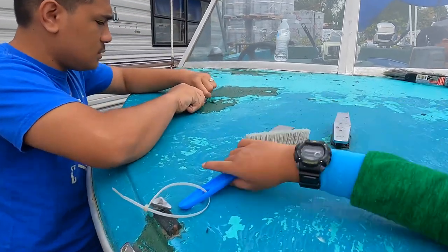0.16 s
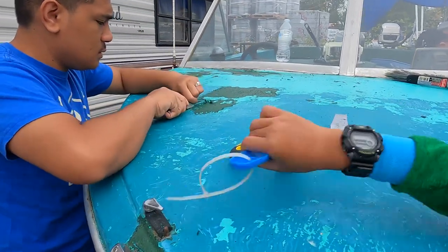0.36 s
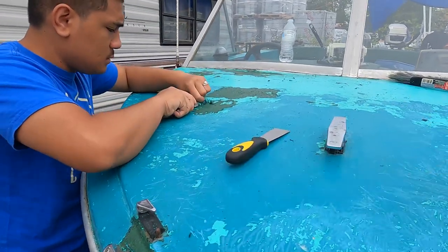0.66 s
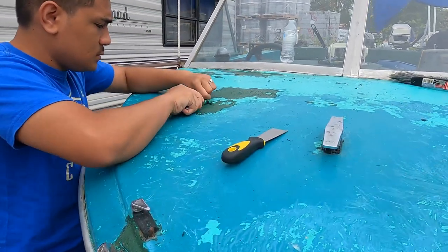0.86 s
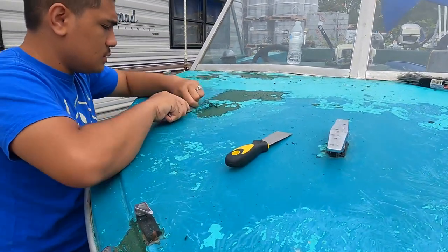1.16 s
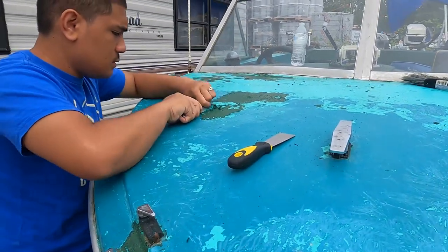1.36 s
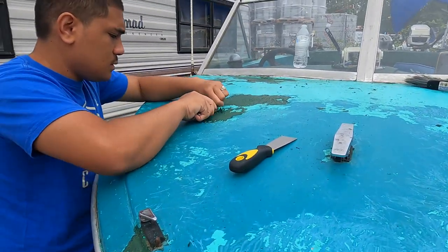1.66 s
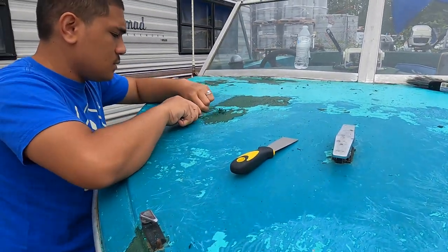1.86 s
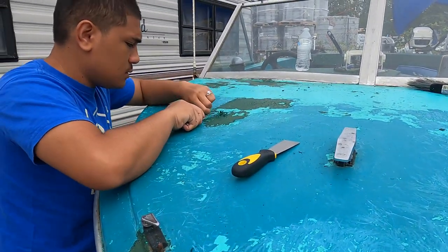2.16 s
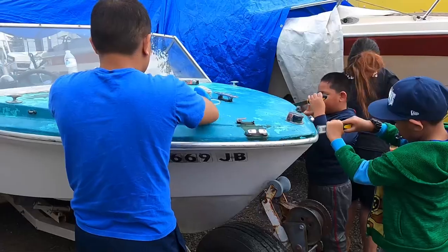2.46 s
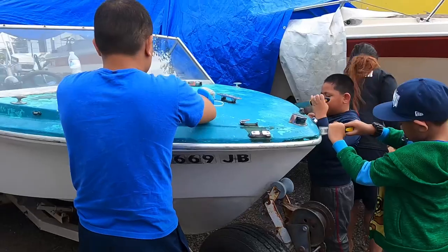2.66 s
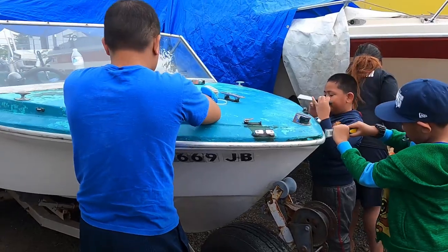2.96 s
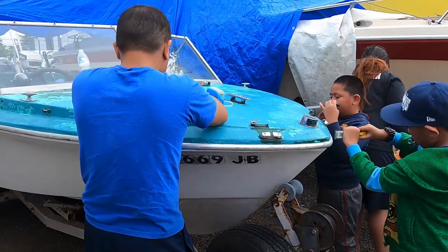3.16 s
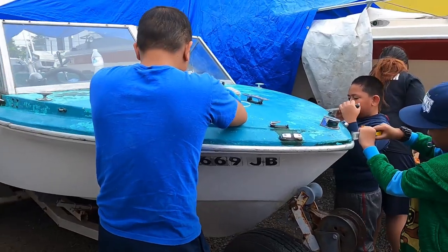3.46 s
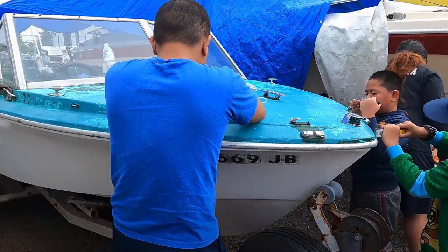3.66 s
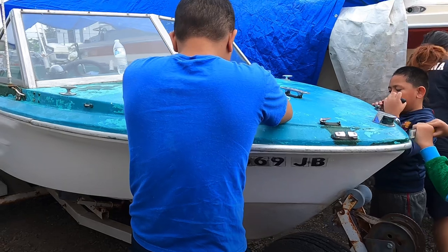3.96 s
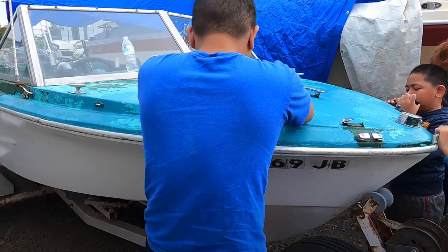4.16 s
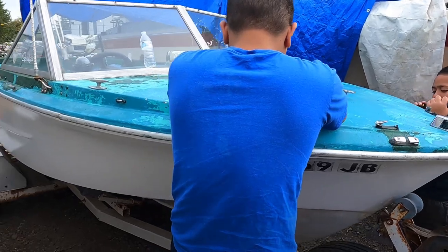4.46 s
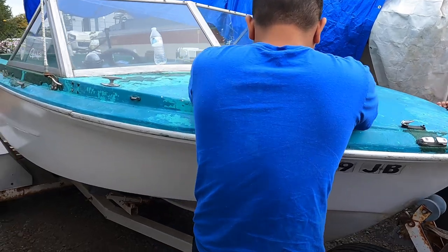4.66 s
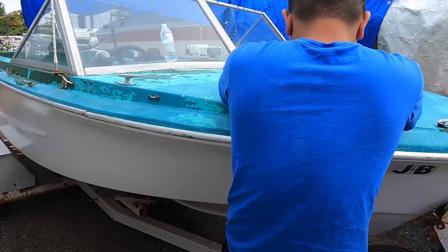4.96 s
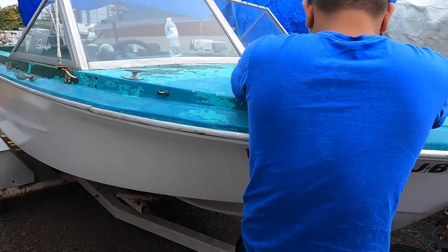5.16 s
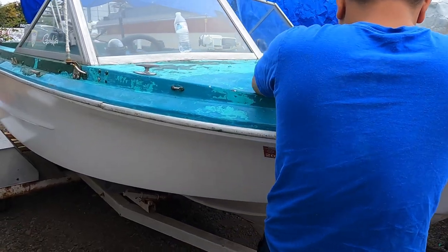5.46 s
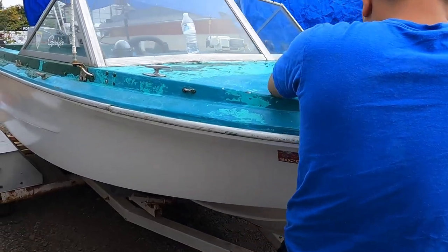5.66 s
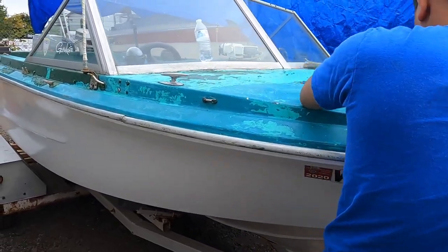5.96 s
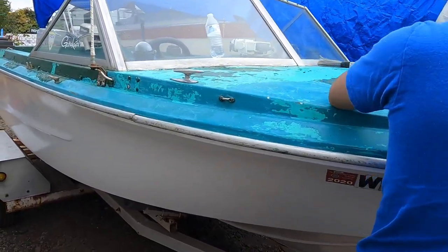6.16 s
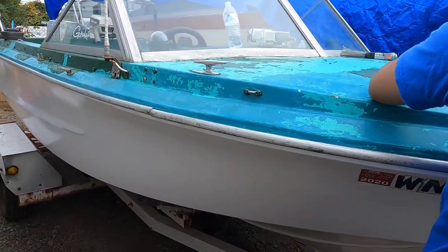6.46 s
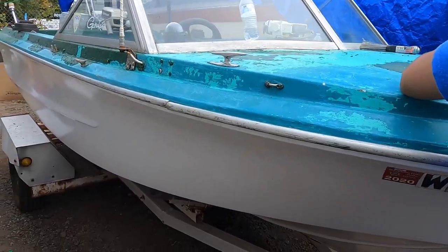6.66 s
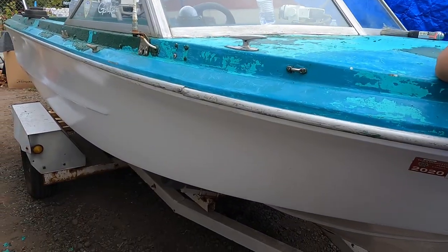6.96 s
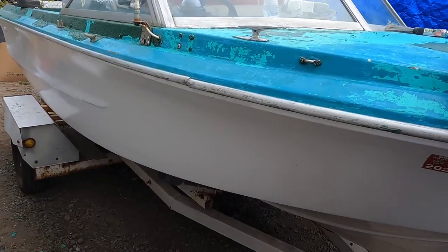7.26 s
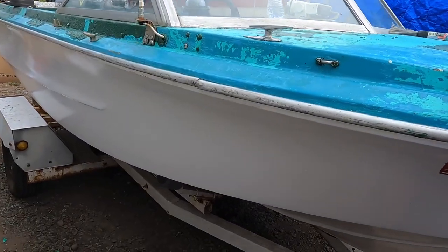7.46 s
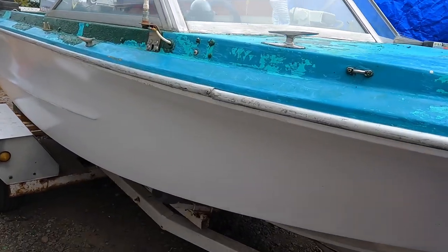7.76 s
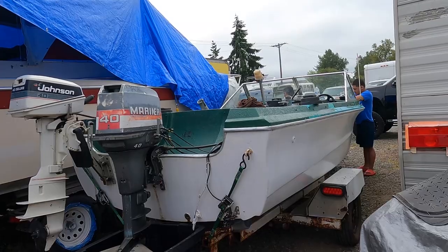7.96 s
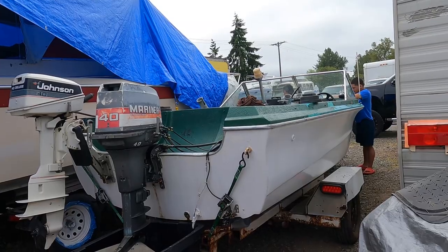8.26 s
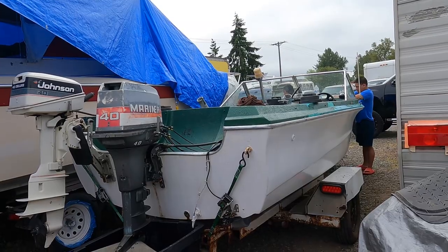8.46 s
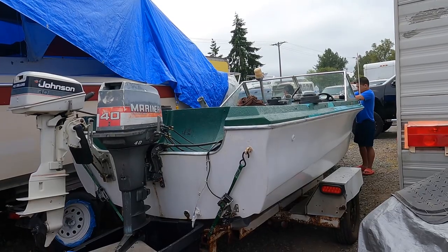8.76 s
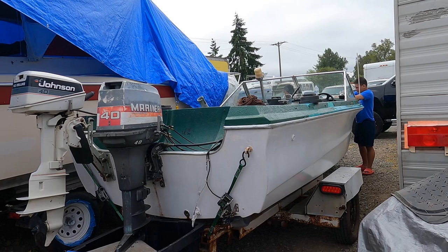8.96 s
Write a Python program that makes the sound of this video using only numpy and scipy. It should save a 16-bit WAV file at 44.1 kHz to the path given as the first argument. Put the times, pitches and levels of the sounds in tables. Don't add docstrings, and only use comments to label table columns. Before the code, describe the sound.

A steel scraper chips old paint off a hollow boat deck in gritty, squeaky bursts, then sounds farther away over low traffic and engine rumble.

```python
import sys
import numpy as np
from scipy import signal
from scipy.fft import rfft, irfft
from scipy.io import wavfile
from scipy.ndimage import uniform_filter1d

SR = 44100
rng = np.random.default_rng(int(sys.argv[2]) if len(sys.argv) > 2 else 0)


def nominal_scale(level):
    x = np.asarray(level, float) / 20
    return 10 ** x


def dump_mix(stems):
    frames = np.atleast_2d(stems).T
    limited = np.clip(frames, -1, 1)
    pcm = np.round(limited * 32767).astype(np.int16)
    wavfile.write(sys.argv[1], SR, pcm)


N = 402187
CONTROL_STEP = 32

# start in seconds, end in seconds, level in dB, swell along the stroke in dB,
# blade angle as brightness in dB.
NEAR_STROKES = [(0, 0.078, -40, -8.5, 4.5), (0.192, 0.432, -52, 2.5, 2.5), (0.499, 0.555, -58, 4.5, -4),
                (0.6, .635, -44, -8, 6.5), (0.636, 0.803, -38, 3.5, 1.5), (0.95, 0.989, -67, 14, 6),
                (1.004, 1.065, -48, 6.5, -3.5), (1.07, 1.143, -44, -8.5, -1), (1.221, 1.273, -51.5, -2, 2),
                (1.311, 1.362, -41.5, 4.5, 0.5), (1.378, 1.533, -42, 9.5, 4), (1.535, 1.628, -37, -7, 2.5),
                (1.649, 1.756, -53, 2, -4.5), (1.771, 1.87, -43.5, -6, -1.5),
                (1.968, 1.989, -35.5, -5.5, 7.5), (2.156, 2.159, -41, -19, 4),
                (2.178, 2.183, -36.5, -5.5, 3.5), (2.199, 2.224, -33, -0.5, -9.5),
                (2.268, 2.333, -33, 4.5, 4), (2.343, 2.372, -33, -3.5, 6.5), (2.38, 2.385, -34, 2, 2)]
FINGERS_DB, FINGERS_DULL_DB = -61, -2
HULL_DB, HULL_DB_PER_ANGLE_DB = 4.5, -0.023
# frequency in Hz, density in dB per Hz.
BLADE_NEAR = [(900, -43), (1500, 0), (2000, -4), (2390, -7), (2700, -4.5), (3300, -9.5), (3820, -3),
              (5200, -8.5), (6340, -9), (7400, -7), (9300, -11), (9800, -16.5), (13000, -18), (16000, -27)]
# frequency in Hz, density in dB per Hz.
HULL = [(65, -29), (130, -4.5), (202, -3), (375, -8), (650, -5), (986, -5.5), (1930, -18.5), (3100, -46),
        (7000, -82.5)]
# frequency in Hz, width in Hz, level in dB.
BLADE_MODES = [(2020, 100, -21), (2770, 990, -5.5), (3520, 430, -7), (4240, 380, -7.5), (5090, 820, -6),
               (7300, 53, -14), (7660, 220, -11.5), (7900, 90, -9)]
# frequency in Hz, width in Hz, level in dB.
HULL_MODES = [(143.6, 17, -3.5), (166, 4.9, -8), (212.6, 12, -3), (366, 23, -3.5), (603, 16, -13.5),
              (830, 55, -18), (1290, 160, -12)]
# frequency in Hz, share from 0 to 1.
ANGLE_SHARE = [(4000, 0), (6500, 0.8)]

# frequency in Hz, density in dB per Hz.
WASH = [(65, -25.5), (110, -4), (150, -13.5), (300, -20.5), (550, -22), (760, -18), (1130, -20),
        (1660, -29.5), (3000, -44), (5680, -56.5), (7500, -64.5), (9380, -84), (15700, -88.5)]
# frequency in Hz, density in dB per Hz.
RUMBLE = [(8, -59.5), (20, 8), (30, 18.5), (65, 13.5), (87, 15), (108, 5.5), (168, -8), (260, -56.5)]
# start in seconds, wash in dB, rumble in dB, low part of the wash in dB.
SPOTS = [
    (0, -43.5, -37.5, -0.5),
    (2.572, -41, -28.5, 1),
    (7.869, -38.5, -36.5, -5),
]
# time in seconds, level in dB.
HEAVY_TRAFFIC = [(0, 5.5), (2.1, 1.5), (2.3, 5.5), (2.6, 4), (3.2, 1), (3.8, -4), (5, -4), (7.8, -2.5),
                 (7.9, 1.5), (9.12, -0.5)]
WASH_SHARE = 0.67
LOW_WASH_HZ = 650

# start in seconds, length in seconds,
# frequency in Hz, glide in Hz per second, level in dB.
SWELLS = [
    (0, 0.273, 81.1, -7, -37.5),
    (.6, 0.39, 53.05, -1.5, -33),
    (.85, 0.37, 116.6, -5, -36),
    (1.3, 0.31, 113.2, -4, -36.5),
    (1.5, 0.76, 81.8, -2.5, -37.5),
    (7.93, 0.11, 723, -4, -41.5),
    (8.4, 0.88, 164.1, 1.2, -48.5),
    (8.45, 0.99, 81.84, 1, -31.5),
]
# start in seconds, length in seconds, frequency in Hz,
# glide in Hz per second, level in dB.
DRONES = [
    (0.5, 0.91, 45, 0.84, -43),
    (1.26, 2.5, 81.67, -1.17, -43.5),
    (3, 4.1, 78.74, -0.9, -35.5),
    (2.56, 0.97, 54.4, 2.02, -30),
    (1.5, 1.905, 81, -1.49, -41.5),
    (3.5, 4.6, 54.6, 0.54, -32.5),
    (3.5, 2.855, 92, -0.796, -41.5),
    (6, 1.96, 71.8, -1.01, -32),
    (8, 1.3, 58, 0.5, -36),
    (8, 1, 83.6, -0.46, -38),
]
# start in seconds, length in seconds, frequency in Hz,
# glide in Hz per second, level in dB.
WHINE = [
    (3.33, .62, 268, -7, -42),
    (6.97, .3, 215, -10, -45),
    (7.5, .34, 210, -16, -46),
]

# start in seconds, length in seconds,
# frequency in Hz, level in dB.
GROANS = [(.28, 0.088, 328, -45), (.62, 0.29, 205, -34), (.64, .2, 364, -36.5), (.72, 0.17, 140, -31.5),
          (1.4, 0.18, 169, -35), (1.42, 0.19, 330, -44.5), (1.74, 0.097, 333, -45),
          (1.95, 0.072, 1090, -33.5), (1.955, 0.053, 500, -36), (2.19, 0.055, 594, -29),
          (1.95, .08, 326, -35.5), (.02, 0.026, 230, -32.5), (2.26, .13, 550, -36.5),
          (2.27, 0.088, 1485, -35), (2.87, 0.13, 328, -37.5), (.645, 0.1, 1950, -35.5),
          (.72, 0.1, 283, -36.5), (1.755, 0.029, 810, -32), (2.3, 0.06, 1300, -33), (4.05, 0.17, 2470, -53),
          (4.57, 0.099, 2550, -48), (8.15, 0.23, 296, -43), (8.17, 0.11, 374, -36.5)]
# start in seconds, length in seconds,
# frequency in Hz, level in dB.
SQUEALS = [(0.658, 0.015, 3620, -33), (0.82, 0.017, 5200, -40), (.76, 0.022, 4200, -31),
           (0.787, .014, 3640, -23), (1.316, .04, 3480, -33.5), (1.318, 0.042, 1350, -27.5),
           (1.484, 0.046, 3800, -29.5), (1.588, 0.04, 4320, -38.5), (2.266, 0.026, 4000, -34),
           (2.272, 0.051, 4800, -33), (2.285, .045, 3700, -33), (2.31, 0.045, 7260, -29),
           (2.325, 0.049, 3990, -30), (5.01, 0.06, 2290, -44), (4.85, .035, 2750, -46.5),
           (4.59, .04, 5400, -50), (5.05, 0.047, 2240, -43), (1.325, 0.034, 6500, -40.5),
           (2.176, 0.012, 3200, -35.5), (2.208, 0.02, 3370, -37), (0.38, 0.024, 4700, -48),
           (.24, .05, 4500, -51), (1.51, 0.028, 7680, -31), (.755, 0.03, 7800, -37)]
# start in seconds, #
# length in seconds, frequency in Hz, level in dB.
HUMS = [
    (3, .41, 774, -42.5),
    (2.89, .085, 3750, -53),
    (5.06, .2, 725, -43),
    (5.49, 0.064, 354, -38),
    (6.09, 0.062, 352, -42),
    (6.34, .15, 225, -40),
    (6.4, .12, 357, -47),
]
SQUEAL_WIDE, GROAN_WIDE, HUM_WIDE = 0.13, 0.22, 0.05
GRIT_DB = 3

# time in seconds, peak in dB, ring in Hz.
FLAKES = [(.0298, -14.5, 2900), (.032, -17, 8000), (.0345, -13.5, 2600), (.039, -25, 2500),
          (.0588, -31, 8000), (.079, -30, 7500), (.082, -36, 5200), (.2265, -31, 3300), (.2545, -36, 3500),
          (.359, -32, 8500), (.3862, -15.5, 4490), (.405, -34, 4700), (.4165, -27, 4770),
          (.4346, -44, 6000), (.502, -38, 6000), (.5082, -25, 4580), (.6352, -38, 3500), (.6567, -32, 2000),
          (.6632, -20, 3650), (.68, -26, 3600), (.7, -19.5, 7800), (.706, -25, 2000), (.7175, -21, 1800),
          (.7148, -18, 5500), (.7352, -20, 7500), (.744, -19, 7300), (.76, -21, 7800), (.7694, -22.5, 3900),
          (.779, -26, 2800), (.786, -16.5, 7800), (.858, -42, 8000), (1.358, -29, 6500),
          (1.4138, -21, 7700), (1.42, -16, 3800), (1.443, -14.5, 8000), (1.4636, -10.5, 3950),
          (1.4929, -18.5, 7000), (1.5174, -15.5, 7900), (1.531, -15.5, 4500), (1.552, -28.5, 7500),
          (1.5892, -22, 7500), (1.6077, -18, 7300), (1.717, -36, 4000), (1.729, -45, 8000),
          (1.9609, -24.5, 5980), (2.03, -39.5, 5000), (2.05, -42, 6000), (2.175, -21, 3620),
          (2.183, -29, 4500), (2.208, -24, 4500), (2.216, -19.5, 3500), (2.229, -30.5, 8500),
          (2.24, -33.5, 8500), (2.275, -21, 8300), (2.29, -17, 8500), (2.298, -21.5, 3000),
          (2.332, -18, 3800), (2.344, -14.5, 7500)]
# time in seconds, peak in dB, ring in Hz.
DIGS = [(.0807, -45, 2340), (.177, -33.5, 4640), (.282, -21.5, 1000), (.3212, -18, 4440),
        (.3577, -36, 2310), (.6095, -20.5, 3750), (.611, -21, 1300), (.692, -16.5, 5170),
        (.7931, -12, 3670), (.7965, -17, 7500), (.8015, -11, 4300), (.808, -17.5, 2500),
        (.8055, -17.5, 7500), (.9976, -11, 980), (.998, -15.5, 4100), (1.0058, -30, 1050),
        (1.032, -29, 1800), (1.068, -25.5, 1200), (1.2456, -26.5, 6400), (1.32, -29, 3300),
        (1.332, -21, 1355), (1.3405, -19.5, 1500), (1.347, -22, 2000), (1.6611, -29, 2100),
        (1.6786, -33.5, 7000), (1.7599, -22.5, 900), (1.7602, -32, 7450), (2.151, -25.5, 1800),
        (2.157, -32, 5000), (2.1944, -13.5, 4434), (2.1955, -20.5, 8300), (2.2722, -24.5, 5090)]
# time in seconds, peak in dB, ring in Hz.
PINGS = [
    (.3215, -30, 4470),
    (.4165, -34, 4700),
    (5.035, -36, 2300),
]
# time in seconds, peak in dB, ring in Hz.
KNOCKS = [(2.886, -10, 724), (2.892, -12.5, 390), (2.909, -15, 610), (3.253, -33, 753), (5.371, -24, 760),
          (5.47, -25.5, 716), (7.269, -31, 1000), (8.18, -24.5, 350), (8.24, -34, 309), (8.3, -22, 280),
          (8.528, -37, 900)]

# peak in seconds, peak in dB, length in seconds.
BESIDE = [(2.742, -45, 0.034), (2.79, -46, 0.038), (2.89, -33.5, 0.015), (2.87, -52, .02),
          (2.909, -46, .03), (3.06, -45, 0.027), (3.259, -37, 0.022), (3.486, -44.5, 0.038),
          (3.53, -49, 0.016), (3.789, -46, 0.048), (4.098, -48.5, 0.091), (4.04, -56.5, .1),
          (4.187, -48, 0.045), (4.322, -46.5, .05), (4.344, -42.5, 0.061), (4.492, -50.5, 0.089),
          (4.605, -43, 0.061), (4.663, -50.5, 0.18), (4.866, -47.5, 0.062), (4.97, -56, 0.1),
          (5.071, -45.5, 0.22), (5.148, -46.5, 0.075), (5.38, -41.5, 0.042), (5.467, -42.5, 0.028),
          (5.61, -44.5, 0.056), (5.77, -51, .03), (5.819, -48.5, 0.067), (5.848, -45.5, 0.038),
          (5.897, -50, .06), (6.088, -50.5, 0.11), (6.282, -46, 0.075), (6.396, -46.5, 0.023),
          (6.501, -45, 0.057), (6.686, -50.5, 0.089), (6.772, -46.5, 0.054), (7.011, -42, 0.06),
          (7.273, -36.5, 0.047), (7.406, -56, 0.11), (7.565, -43, 0.045)]
# peak in seconds, peak in dB, length in seconds.
ASTERN = [
    (8.008, -50, 0.072),
    (8.11, -53, 0.045),
    (8.199, -45, 0.097),
    (8.287, -48, 0.068),
    (8.527, -60, 0.1),
    (8.623, -54, 0.06),
    (8.79, -65, 0.42),
]
# peak in seconds, peak in dB, length in seconds.
PICKS = [(3.39, -58, 0.077), (3.1, -63, .03), (3.598, -62, .03), (3.65, -59, .03), (3.89, -56, 0.04),
         (4.81, -52, 0.12), (4.935, -60, 0.035), (5.242, -50.5, 0.044), (5.515, -52.5, 0.054),
         (6.344, -49, 0.02), (6.864, -55, 0.048), (7.142, -56.5, 0.093), (7.462, -57, 0.053),
         (7.531, -45.5, 0.024), (7.622, -53, 0.015), (7.66, -54.5, 0.046), (7.412, -56, 0.026),
         (7.78, -59, .015), (7.83, -56, 0.06)]
PICK_BRIGHT_DB = 0.5
RISE_SHARE = 0.44
# time in seconds, level in dB, brightness of the pushes in dB.
BRUSH = [(2.57, -56.5, -8.5), (3.7, -66, -2.5), (3.9, -65, -3), (4.2, -65, -4), (5.1, -59.5, -1),
         (6, -57, -1), (6.4, -64, 1.5), (7, -75, 2), (7.8, -62, -2.5), (8.3, -87, 0.5), (8.5, -84, -12),
         (9.09, -64, -6), (9.12, -51, -2)]
# frequency in Hz, density in dB per Hz.
BLADE_FAR = [(900, -32.5), (1500, -6), (2290, -0.5), (3600, -2.5), (4960, -6), (6490, -7.5), (8050, -12),
             (9600, -16.5), (12000, -17.5), (16000, -12.5)]
# time in seconds, top octave in dB.
AIR = [(2.57, -12), (3.3, -8), (3.9, -5), (4.6, 1), (6.2, -0.5), (7.5, 0.5), (7.9, -4.5), (9.0, -3)]

NEAR_ECHO_DB, FAR_ECHO_DB = -12, -9
# frequency in Hz, level in dB.
SIDE_SPECTRUM = [(60, -47), (180, -37.5), (320, -15.5), (550, -12), (970, -7), (1690, -7), (2940, -4.5),
                 (5120, -10), (8930, -15.5), (13000, -12.5)]
# time in seconds, level in dB.
STEREO_OPENING = [(0, -1), (2.45, -2.5), (2.5, -75), (5.8, -39), (6.2, -23), (6.9, -9.5), (7.3, -3.5),
                  (7.9, -3), (9.12, -1)]
AIRY_SIDE_DB = -6
# frequency in Hz, gain in dB.
MICROPHONE = [(30, 0.5), (8500, -2), (10200, -7), (13000, -12), (14000, -20.5), (15700, -23.5),
              (16300, -87)]
# frequency in Hz, threshold in dB.
GATE = [(7000, -69), (9500, -54.5), (12000, -44), (13500, -46), (16000, -44)]
# time in seconds, gain from 0 to 1.
FADES = [(0, 1), (2.362, 1), (2.407, 0), (2.574, 0), (2.62, 1), (7.825, 1), (7.866, .15), (7.905, 1),
         (9.12, 1)]
LIMIT = 0.85


def evened(x):
    return x / np.sqrt(np.mean(x ** 2) + 1e-20)


def band_evened(x, lo_hz, hi_hz):
    hz, z = np.fft.rfftfreq(len(x), 1 / SR), rfft(x)
    band = (hz > lo_hz) & (hz < hi_hz)
    return x * len(x) / np.sqrt(2 * np.sum(abs(z[band]) ** 2))


def read(points, hz):
    f, value = np.transpose(points)
    return np.interp(np.log(hz + 1), np.log(f + 1), value)


def curve(table, column=1):
    rows = np.asarray(table, float)
    return np.interp(np.arange(N) / SR, rows[:, 0], rows[:, column])


def wander(count, smooth_s):
    size = max(int(smooth_s * SR / CONTROL_STEP), 1)
    coarse = rng.standard_normal(count // CONTROL_STEP + 2)
    coarse = uniform_filter1d(uniform_filter1d(coarse, size), size)
    return np.interp(np.arange(count) / CONTROL_STEP, np.arange(len(coarse)), evened(coarse))


def coloured(x, points):
    gain_db = np.maximum(read(points, abs(np.fft.fftfreq(8192, 1 / SR))), -100)
    log_gain = np.log(nominal_scale(gain_db))
    taps = np.fft.ifft(np.exp(np.conj(signal.hilbert(log_gain)))).real[:4096]
    taps = taps.reshape((1,) * (x.ndim - 1) + (-1,))
    return signal.oaconvolve(x, taps, axes=-1)[..., :x.shape[-1]]


def resonate(x, hz, width_hz):
    turn = np.exp(2j * np.pi * np.cumsum(hz * np.ones(len(x))) / SR)
    r = np.exp(-np.pi * width_hz / SR)
    return 2 * (turn * signal.lfilter([1 - r], [1, -r], x / turn)).real


def blend(levels_db, bright_db):
    power = nominal_scale(2 * levels_db) + 1e-20
    total = power.sum(0)
    bright = np.asarray(bright_db) @ power / total
    return np.repeat(np.sqrt(total), CONTROL_STEP)[:N], np.repeat(bright, CONTROL_STEP)[:N]


def near_strokes(rise_s, fall_s):
    t = np.arange(0, N, CONTROL_STEP) / SR
    start, end, db, swell_db, bright_db = np.transpose(NEAR_STROKES)[:, :, None]
    along = np.clip((t - start) / (end - start), 0, 1)
    edges_db = 10 * (np.minimum(t - start, 0) / rise_s + np.minimum(end - t, 0) / fall_s)
    levels_db = np.vstack([db + along * swell_db + edges_db, FINGERS_DB + 0 * t])
    level, bright_db = blend(levels_db, np.append(bright_db, FINGERS_DULL_DB))
    return level, HULL_DB + HULL_DB_PER_ANGLE_DB * bright_db, bright_db


def body(x, modes, drift, ring_db):
    rings = 0
    for hz, width_hz, db in modes:
        presence = nominal_scale(db + 4.9 * wander(len(x), 0.028))
        rings = rings + presence * resonate(x, hz * (1 + drift * wander(len(x), 0.1)), width_hz)
    return x + nominal_scale(ring_db) * rings


def scraper(strokes, span, blade, slips_per_s, size_db, chatter_db, chatter_s, ring_db, boom_db, air):
    level, hull_db, bright_db = (c[span] for c in strokes)
    count, out = len(level), np.zeros(N)
    sizes = nominal_scale(size_db * np.minimum(rng.exponential(1, count), 4)) * rng.choice([-1., 1.], count)
    happens = rng.random(count) < slips_per_s / SR
    slips = evened(sizes * happens * nominal_scale(chatter_db * wander(count, chatter_s)))
    slips = slips / np.sqrt(uniform_filter1d(slips ** 2, size=2000) + .02)
    steel = band_evened(coloured(body(slips, BLADE_MODES, .035, ring_db), blade), 2500, 9500)
    share = np.clip(read(ANGLE_SHARE, np.fft.rfftfreq(count, 1 / SR)), 0, 1)
    treble = irfft(rfft(steel) * share, count)
    fizz = signal.sosfilt(signal.butter(4, 9800, "high", fs=SR, output="sos"), steel)
    steel = steel + nominal_scale(bright_db) * (nominal_scale(air * bright_db) - 1) * fizz
    hull = band_evened(coloured(body(slips, HULL_MODES, .03, boom_db), HULL), 300, 1700)
    out[span] = level * (steel + (nominal_scale(bright_db) - 1) * treble + nominal_scale(hull_db) * hull)
    return out


def field(points, patchy_db, flicker_db):
    frames = N // 256 + 6
    a, b, patches = rng.standard_normal((frames, 513, 3)).T
    patches = evened(uniform_filter1d(uniform_filter1d(patches, 10, 0), 14, 1))
    z = (a + 1j * b) * nominal_scale(patchy_db * patches)
    flat = signal.istft(z, nperseg=1024, noverlap=768)[1][:N]
    return coloured(flat * nominal_scale(flicker_db * wander(N, 0.037)), points)


def traffic():
    start, wash_db, rumble_db, low_db = np.transpose(SPOTS)
    spot = np.searchsorted(start, np.arange(N) / SR, "right") - 1
    heavy_db = curve(HEAVY_TRAFFIC)
    wash = nominal_scale(wash_db[spot] + WASH_SHARE * heavy_db) * band_evened(field(WASH, 1.3, 0.6), 500, 1600)
    low = signal.sosfiltfilt(signal.butter(2, LOW_WASH_HZ, fs=SR, output="sos"), wash)
    wash = wash + (nominal_scale(low_db[spot]) - 1) * low
    return wash + nominal_scale(rumble_db[spot] + heavy_db) * evened(field(RUMBLE, 0.5, 1.6))


def engines(tones, edge, waver_db):
    out = np.zeros(N)
    for s, length_s, hz, glide, db in tones:
        t = np.arange(0, length_s, 1 / SR)
        turns = np.cumsum((hz + glide * t) * (1 + 0.0051 * wander(len(t), 0.047))) / SR
        level = nominal_scale(db + waver_db * wander(len(t), 0.082)) * signal.windows.tukey(len(t), edge)
        part = out[round(s * SR):][:len(t)]
        part += (np.sqrt(2) * level * np.sin(2 * np.pi * turns))[:len(part)]
    return out


def rubbed(events, wide):
    out = np.zeros(N)
    for (s, length_s, hz, db), rub in zip(events, rng.standard_normal((len(events), 20000))):
        count = int(length_s * SR)
        rub = rub * nominal_scale(GRIT_DB * wander(len(rub), .002))
        tone = resonate(resonate(rub, hz, wide * hz), hz, wide * hz)
        out[round(s * SR):][:count] += nominal_scale(db) * evened(tone[-count:]) * np.hanning(count)
    return out


def hits(events, crack_s, crack_db, ring_db, ring_t60_s, thud_t60_s, thud_db, reach, wide):
    out, t = np.zeros(N + SR), np.arange(6000) / SR
    grit, shakes, push = rng.standard_normal((len(events), 3, len(t))).transpose(1, 0, 2)
    cracks, thuds = coloured(grit * np.exp(-t / crack_s), BLADE_NEAR), coloured(push, HULL)
    onset = np.minimum(t / 0.00085, 1)
    for (s, db, hz), crack, shake, thud in zip(events, cracks, shakes, thuds):
        dulling = signal.butter(2, min(reach * hz, .45 * SR), fs=SR)
        crack = nominal_scale(crack_db) * signal.lfilter(*dulling, crack)
        ring = evened(resonate(resonate(shake, hz, wide * hz), hz, wide * hz))
        ring = nominal_scale(ring_db - 60 * t / ring_t60_s) * ring
        thud = nominal_scale(thud_db - 60 * t / thud_t60_s) * evened(thud)
        out[round(s * SR):][:len(t)] += nominal_scale(db) * (crack + (ring + thud) * onset)
    return out[:N]


def echoes(x, t60_s, length_s):
    count = int(length_s * SR) // 20
    taps = np.zeros(count * 20)
    taps[np.arange(count) * 20 + rng.integers(0, 20, count)] = rng.choice([-1., 1.], count)
    taps *= nominal_scale(-60 * np.arange(len(taps)) / SR / t60_s)
    return signal.oaconvolve(x, taps / np.linalg.norm(taps))[:N]


def near_work():
    near = scraper(near_strokes(rise_s=0.0062, fall_s=0.016), slice(0, 110000), BLADE_NEAR,
                   slips_per_s=4000, size_db=3.2, chatter_db=1.8, chatter_s=0.003,
                   ring_db=8.1, boom_db=7.7, air=.1)
    near += hits(FLAKES, crack_s=0.0015, crack_db=2.9, ring_db=-6.5, ring_t60_s=0.012,
                 thud_t60_s=0.048, thud_db=-22.5, reach=7.0, wide=0.18)
    near += hits(DIGS, crack_s=0.0008, crack_db=6.3, ring_db=-6.5, ring_t60_s=0.017,
                 thud_t60_s=0.047, thud_db=-9.5, reach=2.4, wide=0.47)
    near += rubbed(SQUEALS, SQUEAL_WIDE) + rubbed(GROANS, GROAN_WIDE)
    return near + nominal_scale(NEAR_ECHO_DB) * echoes(near, 0.074, .2)


def scattered(x):
    turn = 2 * np.pi * 3.1 * np.arange(N) / SR
    return sum(np.sqrt(2 / 3) * np.cos(turn + k * np.pi / 3) * echoes(x, 0.037, .08) for k in range(3))


def far_strokes(hull_db):
    t = np.arange(0, N, CONTROL_STEP) / SR
    pushes = BESIDE + ASTERN
    s, peak_db, length_s = np.transpose(pushes + PICKS)[:, :, None]
    away = np.maximum((s - t) / RISE_SHARE, (t - s) / (1 - RISE_SHARE)) / length_s
    extra_db = [0] * len(pushes) + [PICK_BRIGHT_DB] * len(PICKS) + [0]
    level, bright_db = blend(np.vstack([peak_db - 10 * away, curve(BRUSH)[::CONTROL_STEP]]), extra_db)
    level = level * (np.arange(N) / SR > BRUSH[0][0])
    return level, hull_db - .5 * bright_db, curve(BRUSH, 2) + bright_db


def far_work():
    far = scraper(far_strokes(hull_db=5.9), slice(N - 290000, N), BLADE_FAR,
                  slips_per_s=9000, size_db=2.48, chatter_db=1.65, chatter_s=0.014,
                  ring_db=-1.5, boom_db=-2.0, air=0.5)
    far += hits(KNOCKS, crack_s=0.0023, crack_db=-14.0, ring_db=-10.5, ring_t60_s=0.12,
                thud_t60_s=0.14, thud_db=-15.5, reach=12., wide=0.58)
    far += hits(PINGS, crack_s=.001, crack_db=-30.0, ring_db=-6.0, ring_t60_s=0.07,
                thud_t60_s=.14, thud_db=-40, reach=4., wide=0.04)
    top = signal.sosfiltfilt(signal.butter(3, 10500, "high", fs=SR, output="sos"), far)
    far = far + (nominal_scale(curve(AIR)) - 1) * top
    return far + nominal_scale(FAR_ECHO_DB) * echoes(far, 0.078, .2)


def scene():
    motors = engines(SWELLS, 0.65, 2.1) + engines(DRONES, 0.069, 2.97) + engines(WHINE, 0.2, 0.55)
    mid = near_work() + traffic() + motors + rubbed(HUMS, HUM_WIDE) + far_work()
    side = coloured(scattered(mid), SIDE_SPECTRUM) * nominal_scale(curve(STEREO_OPENING))
    return np.array([mid + side, mid - side])


def gated(x):
    hz, _, z = signal.stft(x, SR, nperseg=1024)
    power = abs(uniform_filter1d(abs(z) ** 2, size=15, axis=0))
    band_db = 10 * np.log10(power + 1e-20) + 60
    return signal.istft(z * (band_db > read(GATE, hz)[:, None]), SR, nperseg=1024)[1][:N]


def top_cut(x):
    return signal.sosfilt(signal.butter(12, 15720, fs=SR, output="sos"), x)


def record(dry):
    mid, side = (gated(coloured(v, MICROPHONE)) for v in (dry[0] + dry[1], dry[0] - dry[1]))
    airy = signal.sosfilt(signal.butter(12, 11800, "high", fs=SR, output="sos"), scattered(mid))
    side = side + nominal_scale(AIRY_SIDE_DB) * airy
    faded = np.array([mid + side, mid - side]) / 2 * np.clip(curve(FADES), .001, 1)
    return top_cut(LIMIT * np.tanh(faded / LIMIT))


dry = scene()
out = record(dry)
dump_mix(out)
```